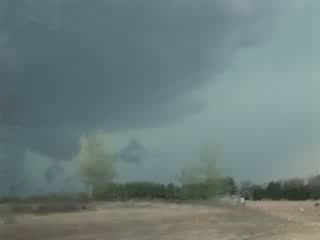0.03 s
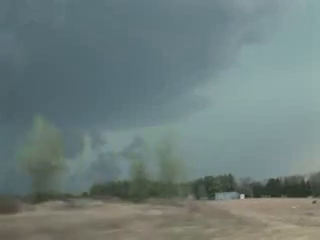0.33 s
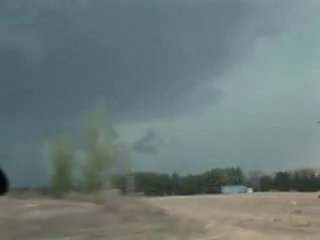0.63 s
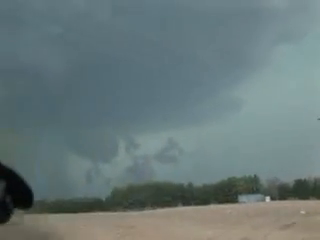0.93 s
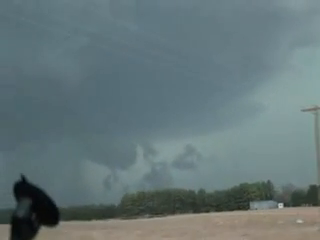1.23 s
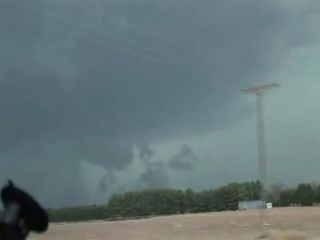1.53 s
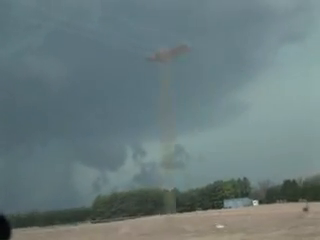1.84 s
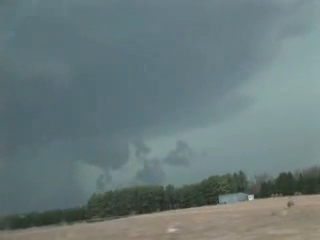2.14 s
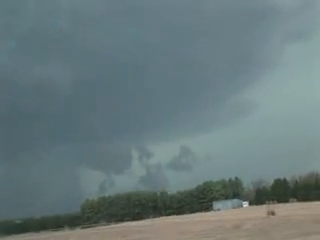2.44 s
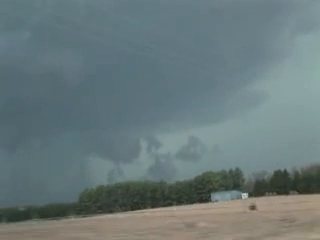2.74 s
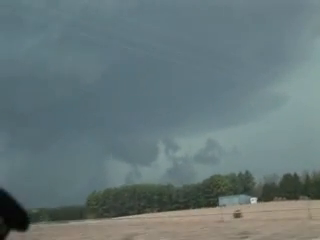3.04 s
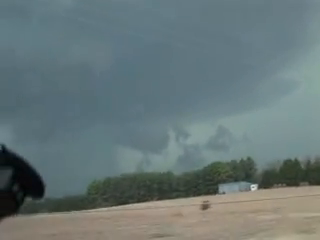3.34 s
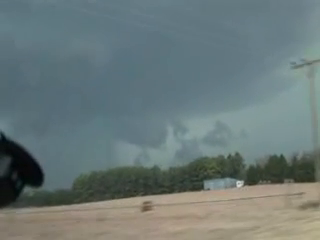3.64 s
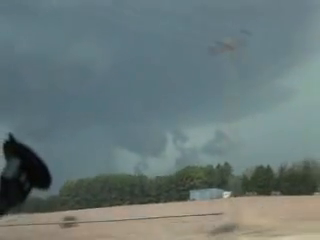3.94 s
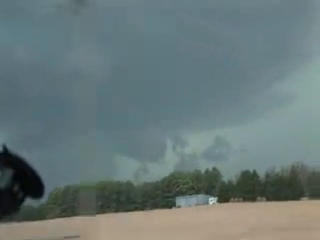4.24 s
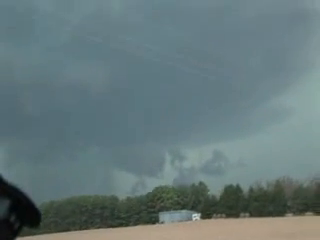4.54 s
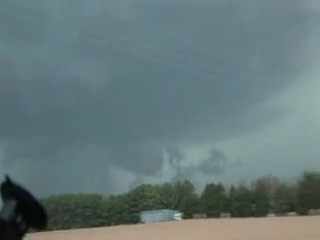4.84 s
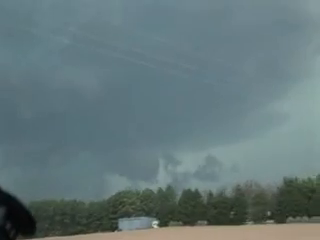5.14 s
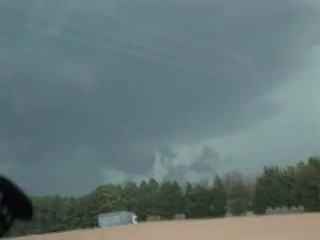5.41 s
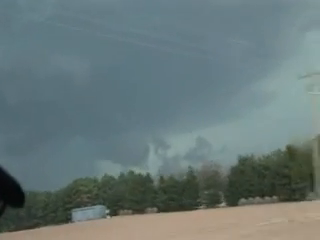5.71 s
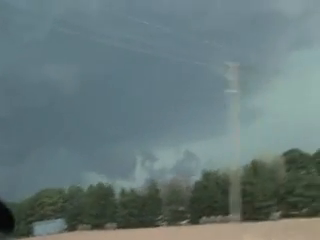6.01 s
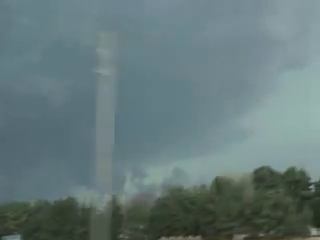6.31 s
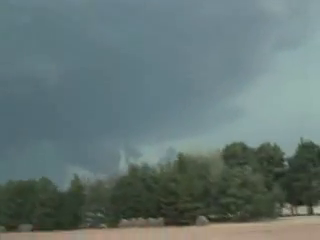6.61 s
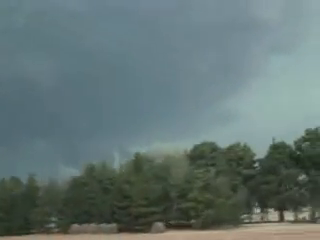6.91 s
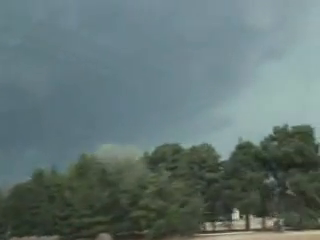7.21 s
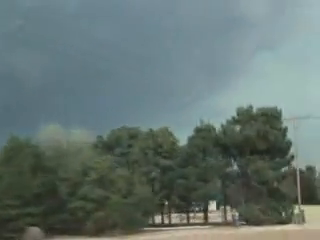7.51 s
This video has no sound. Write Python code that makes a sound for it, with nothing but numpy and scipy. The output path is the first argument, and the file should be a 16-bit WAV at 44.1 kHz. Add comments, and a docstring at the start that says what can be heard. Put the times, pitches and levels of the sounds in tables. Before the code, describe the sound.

Wind flutters and hisses at the window of a cruising car, over a low, constant rumble of tyres on the road.

```python
"""Inside a car at steady speed on a country road, microphone hand-held at a side window.
From the start the road rumbles through the body, the wheels drone and beat slowly, and turbulent air
tears along the window: a fluttering, hollow rush with a hiss on top. From 1.3 s gusts and a few bumps
come through. At 2-3 s the microphone leans away and the rush changes colour. A thin driveline hum
peaks near 4 s; the sharpest gusts follow at 5-6.6 s, while the wheel drone slowly eases."""
import sys
import numpy as np
from scipy import signal
from scipy.fft import rfft, irfft
from scipy.io import wavfile
from scipy.ndimage import uniform_filter1d

SR = 44100
rng = np.random.default_rng(int(sys.argv[2]) if len(sys.argv) > 2 else 0)


def master_out(mix):
    """Clip the mix to full scale and print it as 16-bit PCM to the path in sys.argv[1]."""
    frames = np.transpose(np.atleast_2d(mix))
    ceiling = np.clip(frames, -1, 1)
    pcm = np.round(ceiling * 32767).astype(np.int16)
    wavfile.write(sys.argv[1], SR, pcm)


N = 333396
TIME = np.arange(N) / SR
BINS = np.fft.rfftfreq(N, 1 / SR)

# driveline hum under changing load: t/s, level/dB
DRIVELINE_LEVEL = [(0.12, -59), (1.8, -45), (2.5, -49), (4.2, -39.5), (5.1, -51), (7.54, -43.5)]
# tones of the wheels: multiple of the turning rate, relative level/dB, waver/0-1
WHEEL_ORDERS = [(4, -4, 0.5), (8, 0.5, 0.32), (9, -4, 0.4)]

# roughness of the road: t/s, rumble/dB, cabin boom/dB
ROAD_ROUGHNESS = [(0.12, -25, -26), (1.2, -26, -25.5), (1.8, -24, -26), (2.3, -25.5, -25.5),
                  (2.95, -25.5, -24), (3.5, -27, -29), (3.85, -24.5, -24.5), (4.4, -24, -29),
                  (5.1, -25, -27.5), (5.6, -25.5, -27.5), (6.75, -26, -26.5), (7.54, -23.8, -29)]
# bumps in the road: t/s, length/s, rumble lift/dB, boom lift/dB
ROAD_BUMPS = [(1.62, 0.1, 4, 2), (2.03, 0.094, 6, 2), (2.943, 0.097, 1.5, 2.5), (3.35, 0.17, 3.5, 1),
              (3.86, .08, 0, 4), (4.317, .08, 7, 1), (5.048, .12, -1.5, 5), (6.77, .05, -1, 4)]
# spectra of body rumble and cabin boom: f/Hz, relative level/dB
RUMBLE_SPECTRUM = [(4, -34.5), (10, -14), (20, -1.5), (33, -0.5), (55, 1), (75, -2.5), (100, -6),
                   (130, -11), (250, -31.5), (600, -73)]
BOOM_SPECTRUM = [(80, -22), (115, -5.5), (140, 0.5), (172, 0.5), (195, -4.5), (215, -9), (250, -17.5),
                 (330, -22.5), (450, -22.5), (800, -46.5), (2000, -78)]
# standing waves of the cabin air: f/Hz, width/Hz, lift/dB
CABIN_MODES = [(151, 8.9, 0.5), (170.2, 5.1, 2.5)]

# microphone position: t/s, lean away from its usual place/0-1
MIC_LEAN = [(0.12, 0.46), (1.0, 0), (1.95, 0.02), (2.25, 0.9), (2.8, 1), (3.15, 0.4), (3.5, 0.2),
            (4.3, 0.1), (5.0, 0.2), (5.8, 0.3), (6.3, 0.64), (7.0, 0.1), (7.54, 0.76)]
# steady airstream at the window: t/s, rush/dB, hiss/dB
AIRSTREAM = [(0.12, -40.5, -46), (1.2, -38.5, -45.0), (1.9, -38, -45), (2.4, -36, -42.5),
             (3.3, -37.5, -43.5), (4.1, -36.5, -44), (5.45, -38.5, -45), (6.2, -37, -45.5),
             (6.8, -36.5, -43.5), (7.54, -36.5, -45)]
# gusts, negative where the flow falls slack: t/s, length/s, lift/dB
WINDOW_GUSTS = [(1.34, .04, -3), (1.49, 0.094, 2.4), (1.94, 0.11, 3), (2.368, 0.019, -11),
                (2.45, 0.044, 2.5), (2.71, 0.055, 2.5), (2.98, 0.095, 2.2), (3.044, .012, 6.5),
                (3.6, 0.11, 3), (3.842, .09, 3.5), (4.167, 0.16, 5), (4.3, 0.049, 3), (4.7, .05, 3.5),
                (4.83, 0.085, 2.5), (4.89, 0.024, -5), (5.053, 0.029, 6.5), (5.124, 0.081, 5.3),
                (5.211, 0.034, 7.5), (5.323, 0.14, 3), (5.43, .1, -2.5), (5.726, .3, 4), (6.196, .02, -5),
                (6.293, 0.095, 6), (6.398, 0.032, 5), (6.468, .04, 5), (6.556, 0.044, 4.2),
                (6.612, 0.032, -4.5), (6.864, 0.13, 2.5), (7.15, 0.28, 2.5), (7.299, 0.015, -8),
                (7.453, 0.028, -7)]
# spectra of the airstream: f/Hz, relative level/dB
RUSH_SPECTRUM = [(100, -13), (280, 6), (440, 1.5), (495, -2.5), (560, 2), (690, -5), (800, -0.5),
                 (960, -3.5), (1060, -8), (1170, -7.5), (1450, -16.5), (2200, -18), (4000, -39.5),
                 (7000, -70.5)]
HISS_SPECTRUM = [(600, -12.5), (1500, -2), (2100, 0), (2500, -0.5), (2630, -3.5), (2800, -3), (3300, -9),
                 (4000, -14), (4550, -20.5), (5450, -24.5), (6050, -26), (6500, -36), (7200, -36.5),
                 (8800, -31.5), (10000, -34)]
# cabin and window resonances (negative: nulls): f/Hz, width/Hz, lift in usual place/dB, lift leaning/dB
RUSH_RESONANCES = [(451, 26, 4, 1), (484, 32, -0.5, -2.5), (564, 93, 4, 1), (757, 100, 4, 1),
                   (940, 86, 5.5, 7.5), (1100, 72, 2, 5), (1160, 35, -3.5, 0), (1225, 33, 3.5, -2)]
HISS_RESONANCES = [(1602, 58, 2.5, 5), (1710, 90, -0.5, 2.5), (1838, 33, 6, -3.5), (2024, 50, 5.5, 1),
                   (2200, 60, 0.5, 3), (2340, 90, -3, 1), (2470, 87, 2.5, 0), (2740, 110, -0.5, 4),
                   (3025, 80, 3, -0.5), (3430, 120, 2, 0.5), (3984, 83, 4, 0.5), (5030, 350, 8.5, 6.5),
                   (5840, 300, 2.5, 5.5)]
# hollow note of the window gap: t/s, f/Hz
GAP_NOTE = [(0.12, 1345), (1.3, 1266), (2.6, 1280), (4.1, 1243), (5.5, 1273), (7.54, 1264)]


def amp(db):
    """Decibels to gain."""
    return 10 ** (np.asarray(db) / 20)


def unit(x):
    """Scales to rms 1."""
    return x / np.sqrt(np.mean(x ** 2) + 1e-20)


def follow(rows):
    """The columns of a curve table at every sample."""
    times, *columns = np.transpose(rows)
    return [np.interp(TIME, times, column) for column in columns]


def bell(t, length):
    """A smooth rise and fall around the time t."""
    return np.exp(-(2 * (TIME - t) / length) ** 2)


def wander(slow_hz, fast_hz):
    """Random motion of rms 1, its energy between two rates."""
    shape = BINS / np.hypot(BINS, slow_hz) / np.sqrt(1 + (BINS / fast_hz) ** 4)
    return unit(irfft(rfft(rng.standard_normal(N)) * shape, N))


def colour(x, spectrum, modes=()):
    """Passes x through a smooth spectrum with resonant humps; rms 1."""
    hz, db = np.transpose(spectrum)
    shape_db = np.interp(np.log(BINS + 1), np.log(hz + 1), db)
    for centre, width, lift in modes:
        shape_db += lift / (1 + (2 * (BINS - centre) / width) ** 2)
    return unit(irfft(rfft(x) * amp(shape_db), N))


def steady(x, samples):
    """Evens out the slow swells of a noise."""
    return x / np.sqrt(uniform_filter1d(x ** 2, samples) + 1e-9)


def resonate(x, hz, width_hz):
    """A resonance that follows the curve hz."""
    carrier = np.exp(2j * np.pi * np.cumsum(hz) / SR)
    pole = np.exp(-np.pi * width_hz / SR)
    return (carrier * signal.lfilter([1 - pole], [1, -pole], x / carrier)).real


def hum(cycles, waver):
    """A tone that sways in level and phase."""
    sway = 1 + waver * (wander(0.2, 3) + 1j * wander(0.33, 1.4))
    return unit((sway * np.exp(2j * np.pi * (cycles + rng.random()))).real)


def eddies(flutter, depth_db):
    """White noise that surges with the turbulence."""
    return unit(rng.standard_normal(N) * amp(depth_db * flutter))


def driveline(hz=257):
    """Far back, a thin hum above the wheel drone swells and fades with the load."""
    hum_db, = follow(DRIVELINE_LEVEL)
    return amp(hum_db) * hum(hz * TIME, waver=0.27)


def wheels(turn_hz=14.17, slip=0.0038, beat_hz=1.44, fade_db_per_s=0.56):
    """Uneven tyres hum on multiples of their turning rate; their rates differ slightly, so they beat."""
    beat = abs(1 + 0.4 * np.exp(2j * np.pi * beat_hz * (TIME - 0.45)))
    turns = np.cumsum(turn_hz * (1 + slip * wander(0.16, 1.9))) / SR
    drone = sum(amp(db) * hum(multiple * turns, waver) for multiple, db, waver in WHEEL_ORDERS)
    return amp(-29.5 - fade_db_per_s * TIME) * beat * drone


def road(flutter, heave_db=0.75):
    """Rough asphalt and bumps shake the body; the cabin air booms, stirred also by the wind."""
    rumble_db, boom_db = follow(ROAD_ROUGHNESS)
    for t, length, rumble_lift, boom_lift in ROAD_BUMPS:
        rumble_db += rumble_lift * bell(t, length)
        boom_db += boom_lift * bell(t, length)
    rumble_db += heave_db * wander(1.5, 7.6)  # the body heaves on its springs
    boom_db += heave_db * wander(1.5, 8)
    rumble = steady(colour(rng.standard_normal(N), RUMBLE_SPECTRUM), samples=7000)
    boom = steady(colour(eddies(flutter, depth_db=2.5), BOOM_SPECTRUM, CABIN_MODES), samples=6000)
    return amp(rumble_db - 0.18) * rumble + amp(boom_db + 0.31) * boom


def reflections(x, echo_db=-19, drift_s=0.00011, count=8):
    """Nearby glass and trim return faint echoes, whose delays drift with the swaying hand."""
    heard = x.copy()
    for delay_s in rng.uniform(0.003, 0.014, count):
        late_s = delay_s + drift_s * wander(0.08, 0.4)
        heard += rng.choice([-1, 1]) * amp(echo_db) * np.interp(TIME - late_s, TIME, x)
    return heard / np.sqrt(1 + count * amp(echo_db) ** 2)


def cabin(x, spectrum, modes, lean):
    """The cabin's resonances gain or lose strength as the microphone moves through them."""
    usual = colour(x, spectrum, [(hz, width, db) for hz, width, db, _ in modes])
    leaning = colour(x, spectrum, [(hz, width, db) for hz, width, _, db in modes])
    return (1 - lean) * usual + lean * leaning


def turbulence():
    """Flow along the window: large eddies with fast, small ones riding on them."""
    return unit(wander(5.4, 29) + 0.76 * wander(30, 210))


def window_gap(flutter, gust_db, lean, drift_hz=11, width_hz=150):
    """The gap's hollow note grows with the gusts and fades as the microphone leans away."""
    hz = follow(GAP_NOTE)[0] + drift_hz * wander(0.3, 1.5)
    note = eddies(flutter, depth_db=2.0)
    for _ in range(2):
        note = resonate(note, hz, width_hz)
    return amp(-48.5 + 1.1 * gust_db - 7.5 * lean ** 2) * unit(note)


def wind(flutter):
    """Close to the microphone, one gusting flow drives the hollow rush, the hiss and the gap's note."""
    rush_db, hiss_db = follow(AIRSTREAM)
    lean, = follow(MIC_LEAN)
    gust_db = sum(db * bell(t, length) for t, length, db in WINDOW_GUSTS)
    note = window_gap(flutter, gust_db, lean)
    rush = cabin(eddies(flutter, depth_db=1.8), RUSH_SPECTRUM, RUSH_RESONANCES, lean)
    hiss = cabin(reflections(eddies(flutter, depth_db=1.61)), HISS_SPECTRUM, HISS_RESONANCES, lean)
    return amp(rush_db + gust_db + 0.84) * rush + amp(hiss_db + 0.91 * gust_db + 0.37) * hiss + note


def scene():
    """Road, wind, wheels and driveline at one microphone by the side window."""
    flutter = turbulence()
    return (road(flutter) + wind(flutter) + wheels() + driveline())[None]


def record(dry):
    """The microphone opens just after the start and takes in sound up to about 10 kHz."""
    fade_in = np.clip((TIME - 0.091) / 0.012, 0, 1)
    lowpass = signal.firwin(511, 10100, window=("kaiser", 9), fs=SR)
    return signal.oaconvolve(dry * fade_in, lowpass[None], "same")


dry = scene()
out = record(dry)
master_out(out)
```